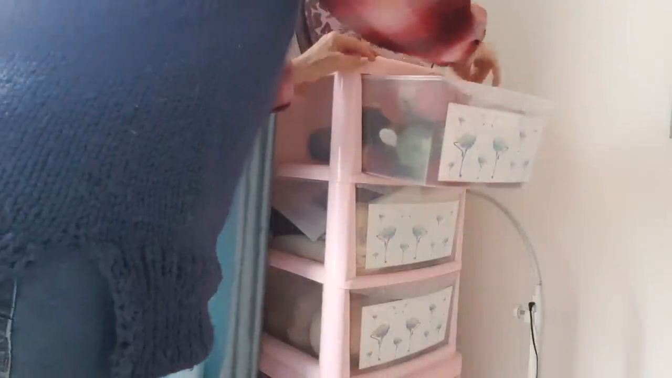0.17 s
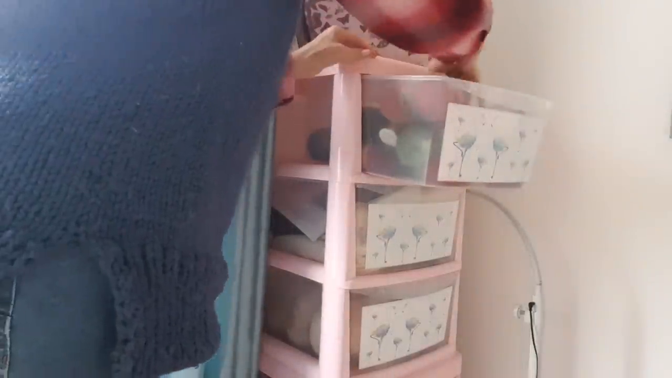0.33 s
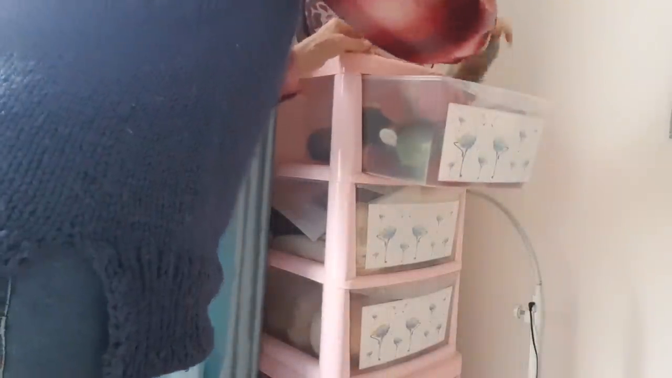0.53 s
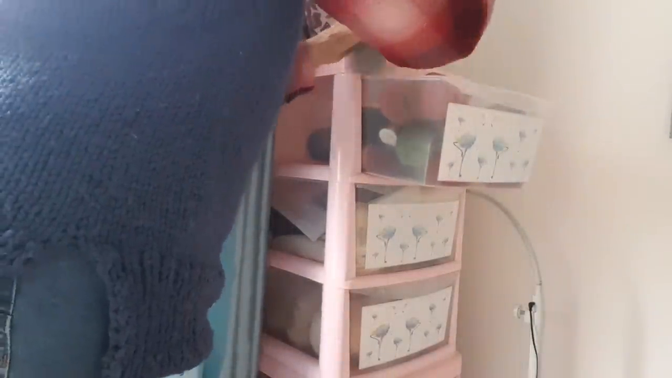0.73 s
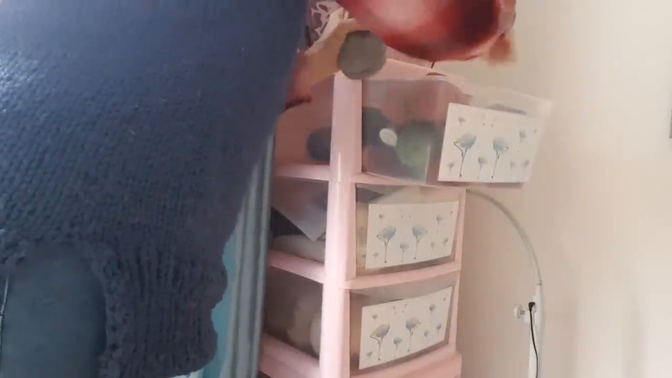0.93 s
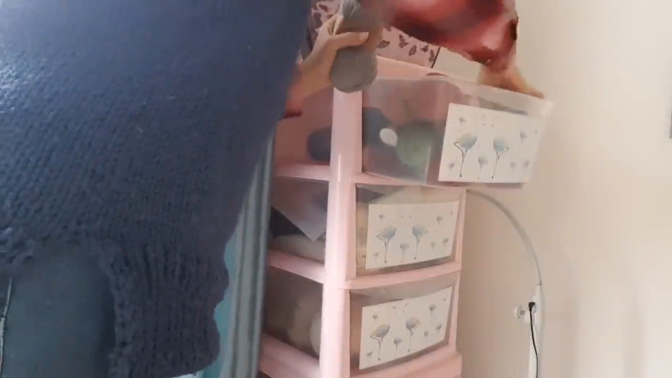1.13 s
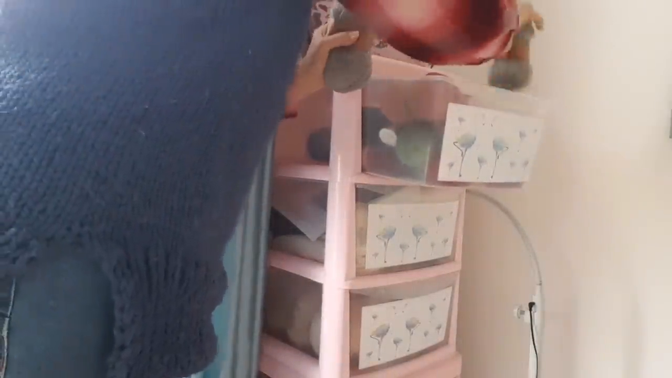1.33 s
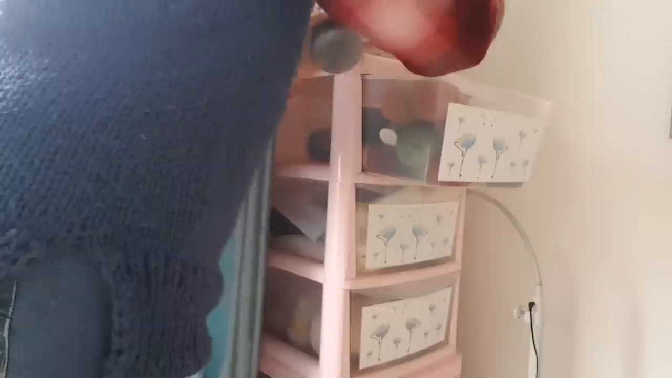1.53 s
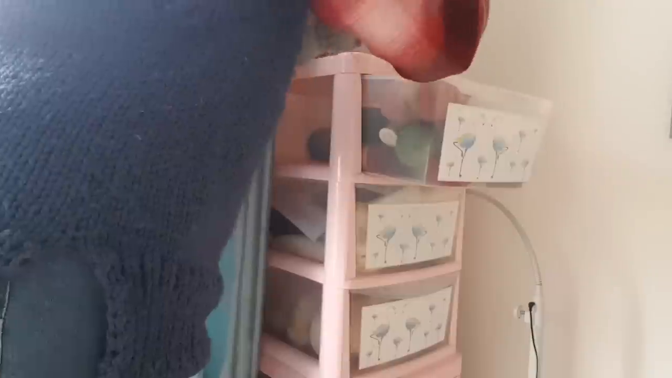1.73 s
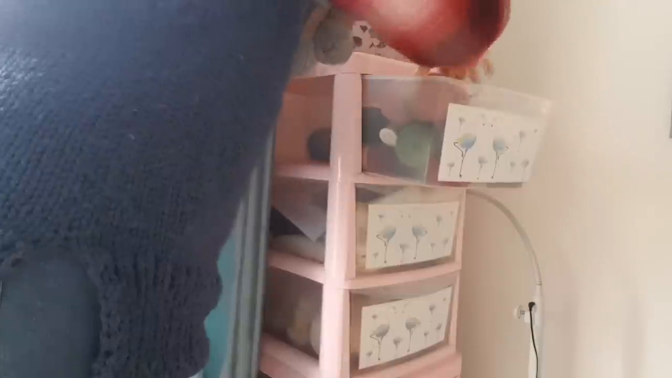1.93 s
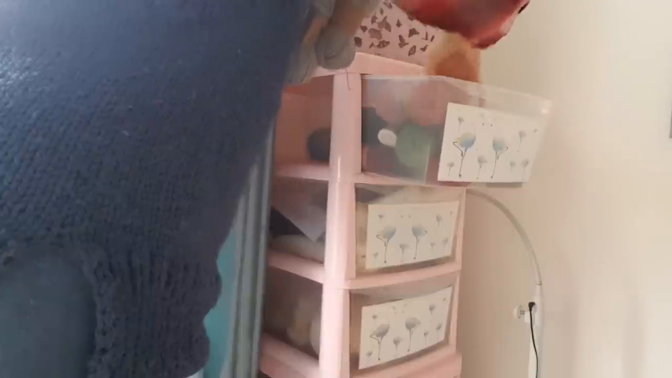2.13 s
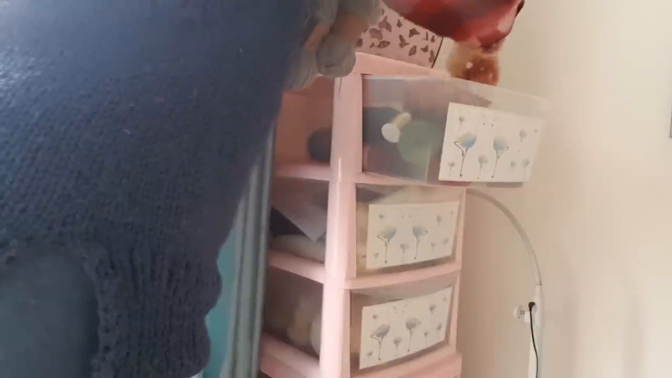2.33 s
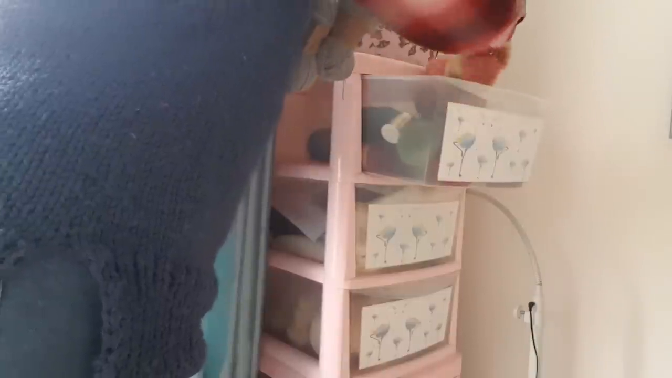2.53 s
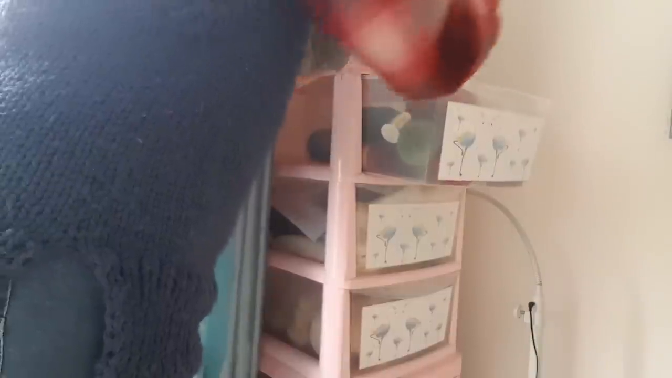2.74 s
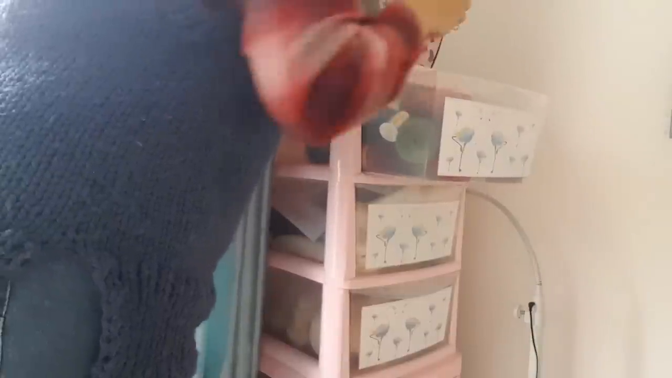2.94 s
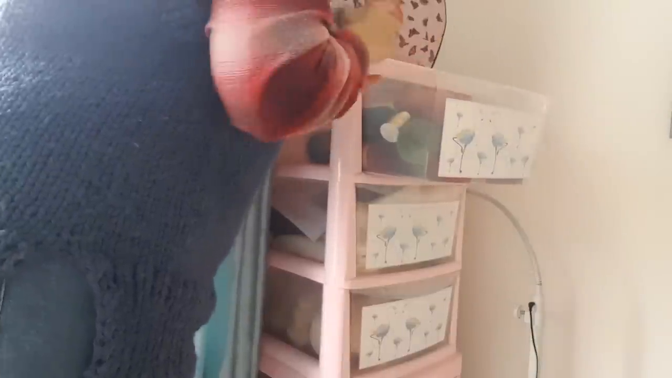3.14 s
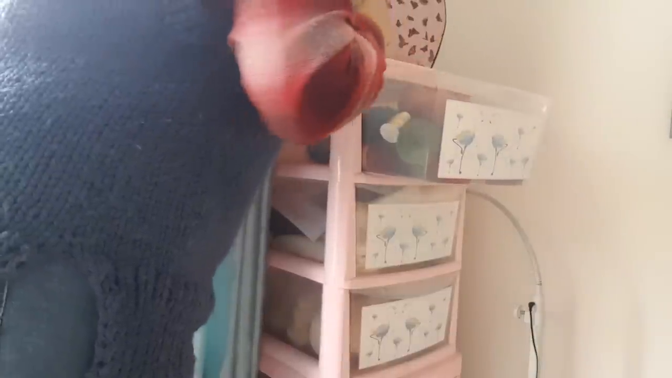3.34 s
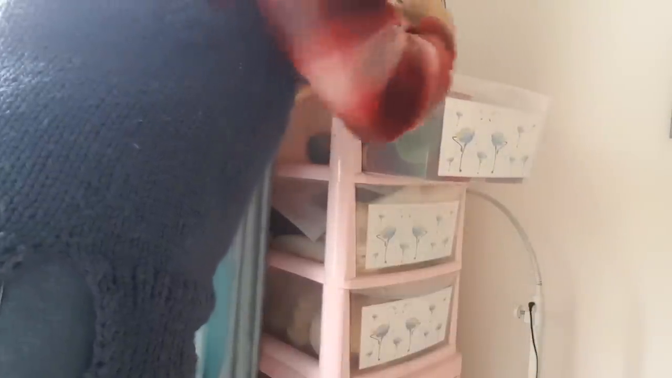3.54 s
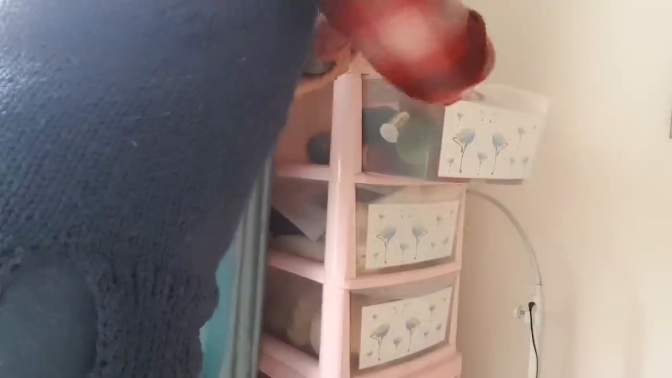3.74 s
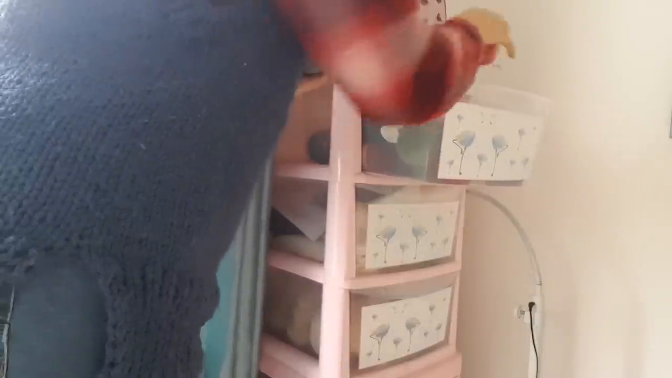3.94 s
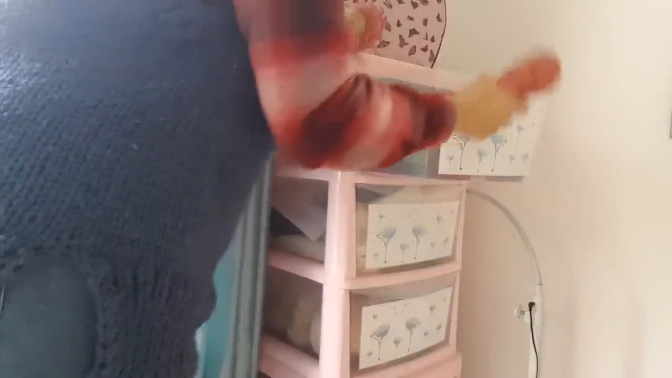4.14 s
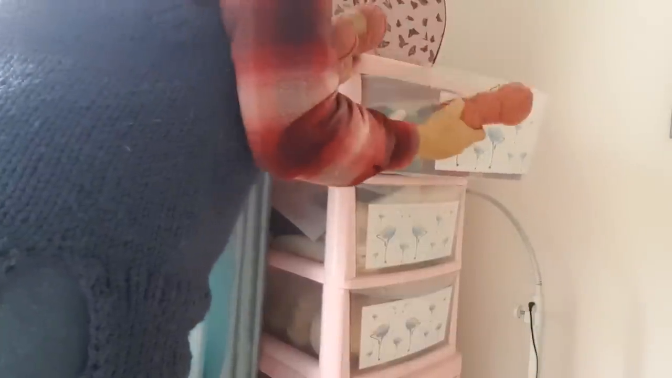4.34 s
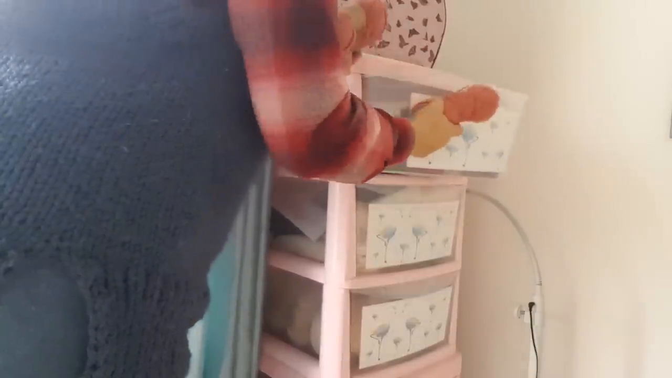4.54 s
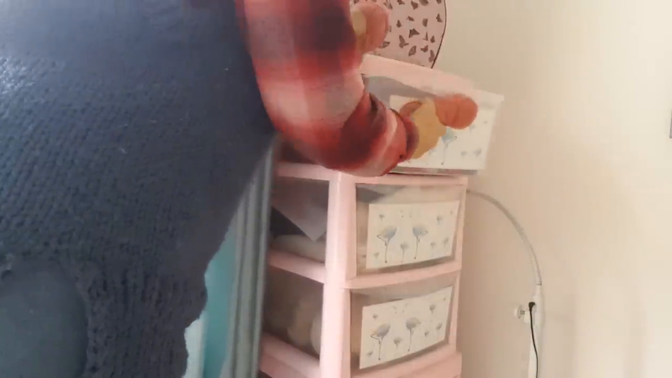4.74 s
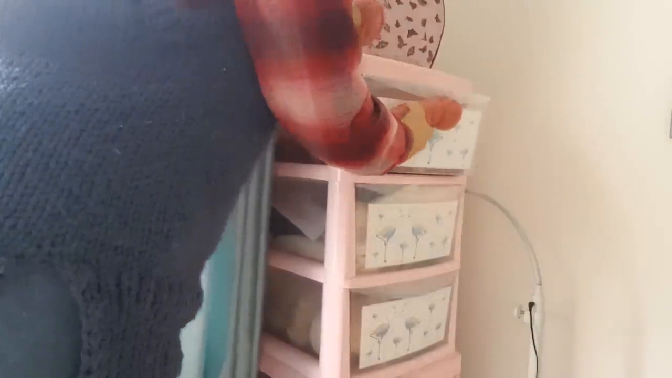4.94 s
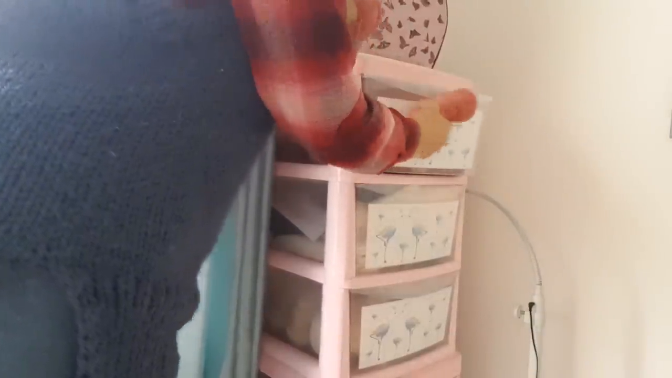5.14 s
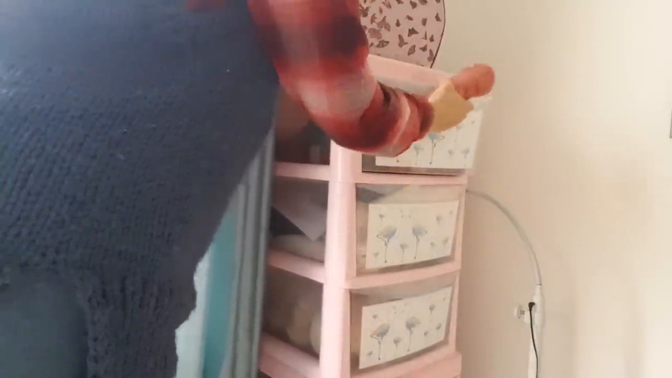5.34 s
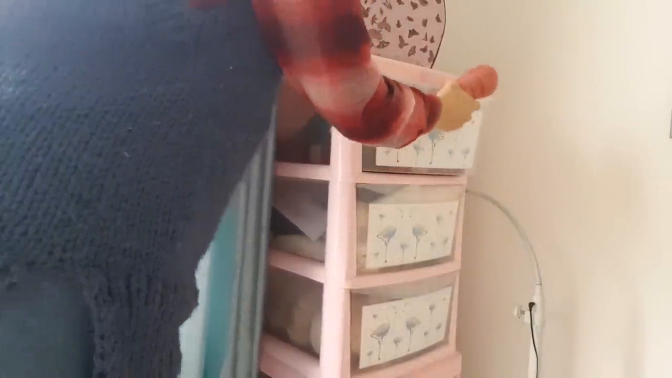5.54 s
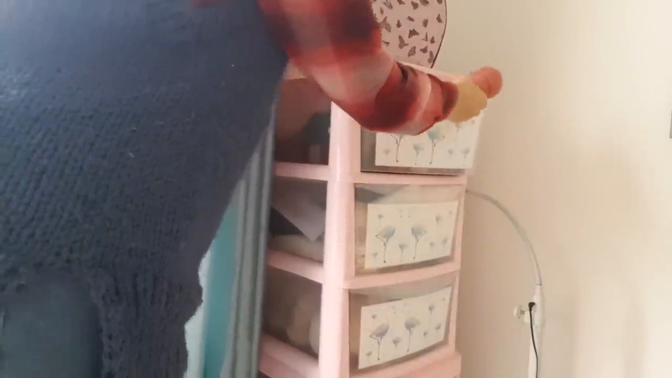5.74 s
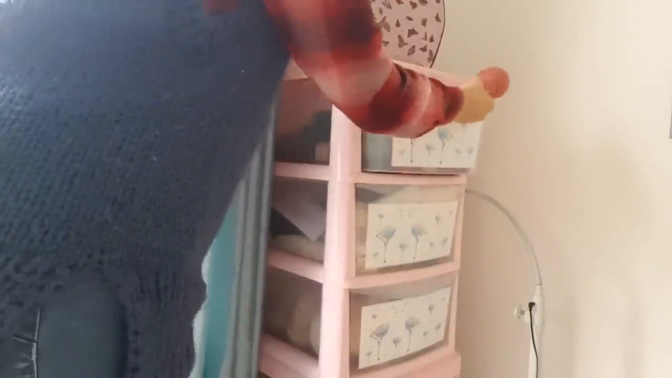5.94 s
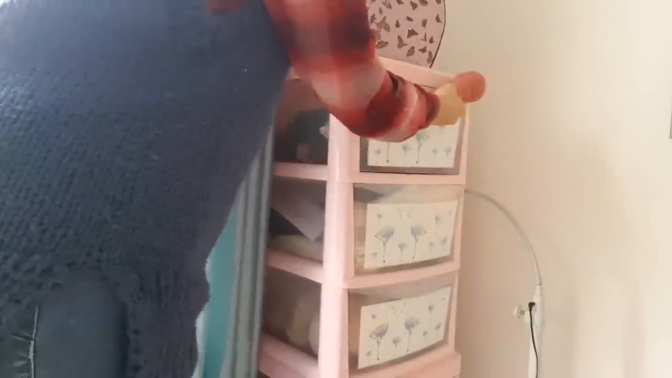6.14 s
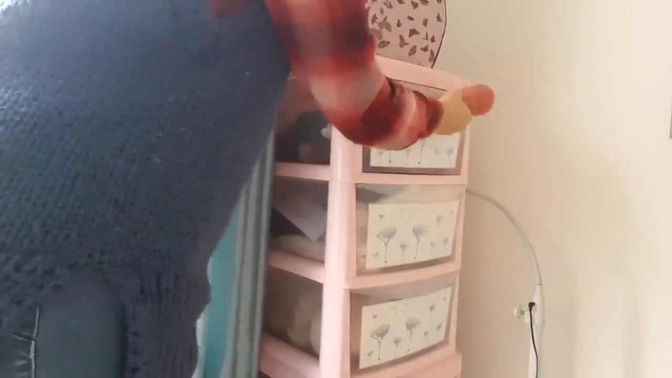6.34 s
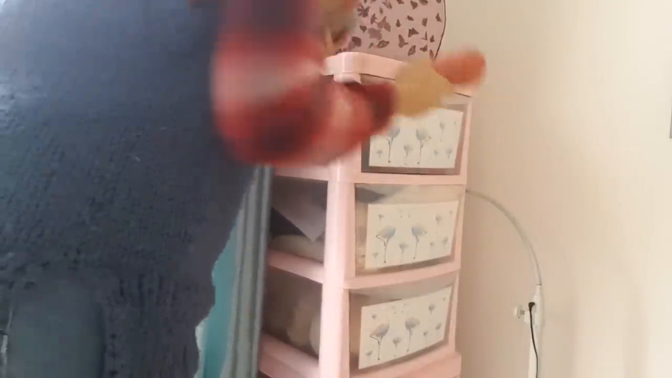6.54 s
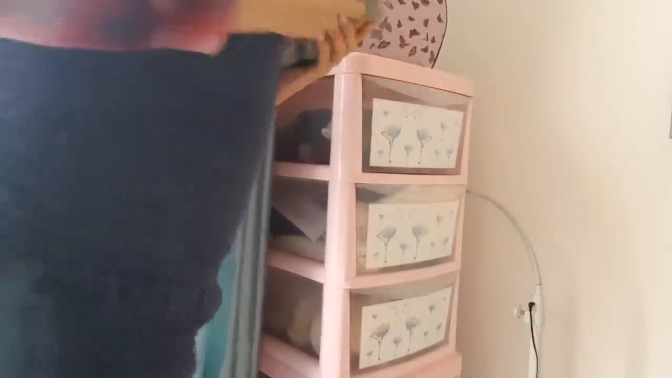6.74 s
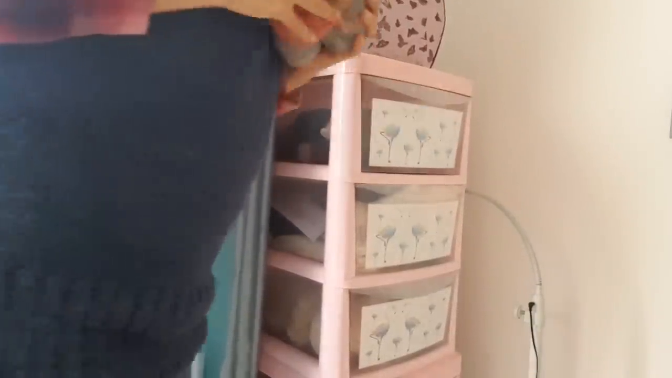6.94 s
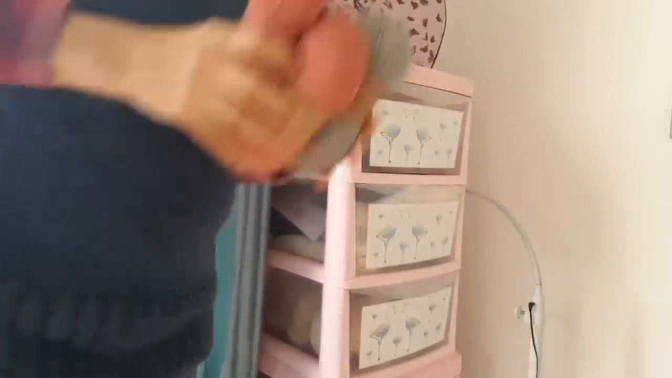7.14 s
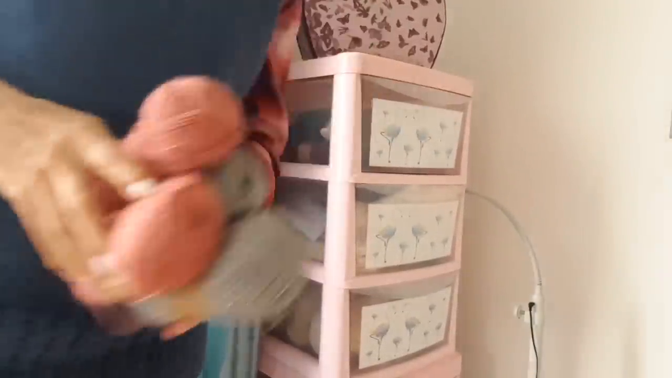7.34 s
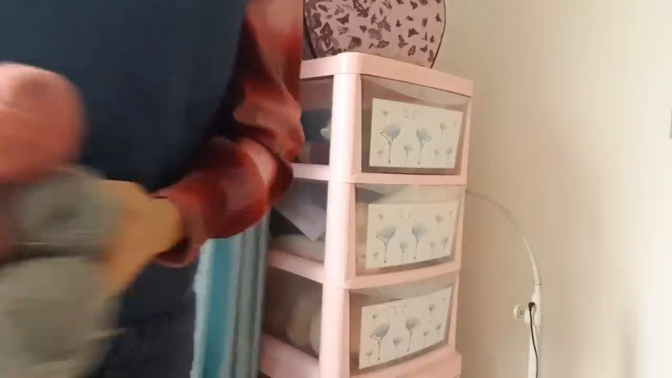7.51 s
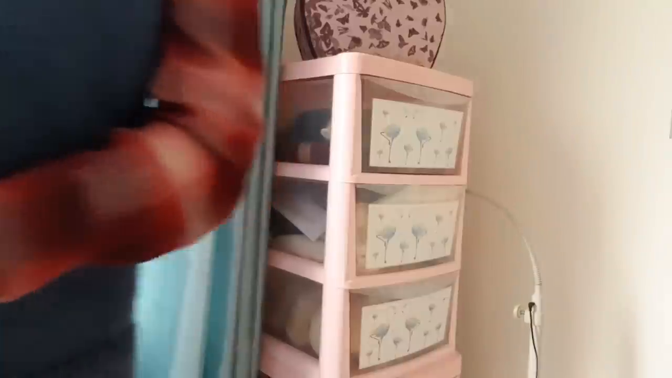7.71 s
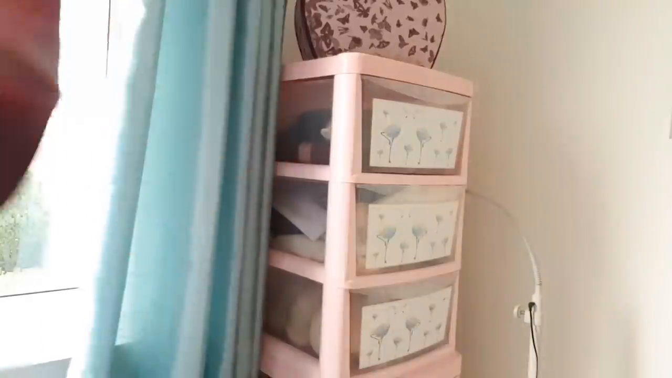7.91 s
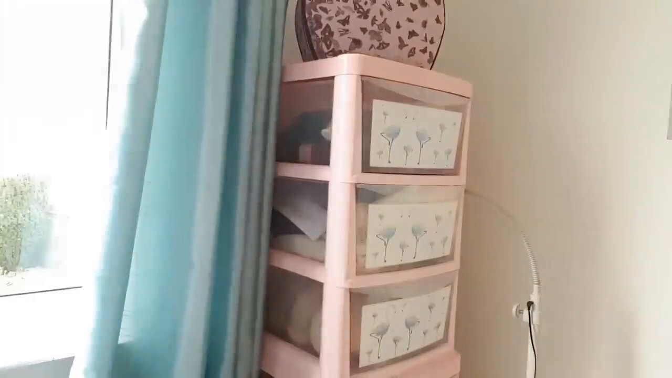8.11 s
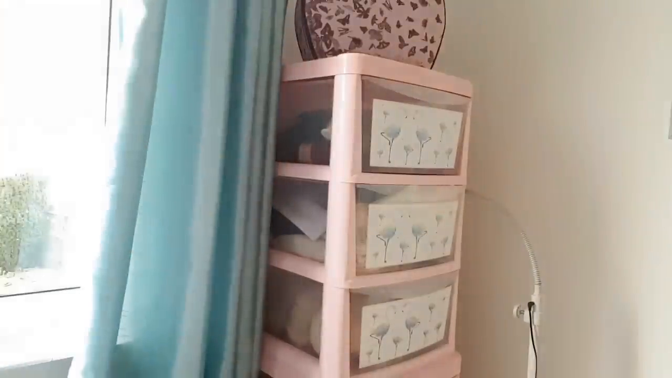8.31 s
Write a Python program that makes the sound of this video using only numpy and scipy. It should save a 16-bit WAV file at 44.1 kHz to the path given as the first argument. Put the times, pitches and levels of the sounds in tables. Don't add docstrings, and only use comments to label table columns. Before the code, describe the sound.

A phone about a metre away picks up a flimsy plastic drawer tower indoors. Quiet fumbling first: brushes, snaps, a yarn ball's dull thump, small hollow bumps. Then stick-slip scraping and knocking as the drawer is forced in, hitting hard twice, the second burst loudest, with a low tubby ring. Fabric swishes and a couple of clacks follow, then soft low steps, leaving a near-quiet room with short reverberation.

```python
import sys
import numpy as np
from scipy import signal
from scipy.fft import rfft, irfft, next_fast_len
from scipy.io import wavfile
from scipy.ndimage import uniform_filter1d

SR = 44100
rng = np.random.default_rng(int(sys.argv[2]) if len(sys.argv) > 2 else 0)


def to_linear_factor(level_db):
    exponent = np.asarray(level_db, float) / 20
    return 10 ** exponent


def inscribe(sig):
    pcm = np.round(np.clip(np.atleast_2d(sig).T, -1, 1) * 32767)
    wavfile.write(sys.argv[1], SR, pcm.astype(np.int16))


N = 369100
SIZE = 20480
HZ = np.fft.rfftfreq(SIZE, 1 / SR)

# [f/Hz, width/Hz, level/dB]
BELLY_MODES = [(130, 57, -11), (149.4, 13.3, 0), (196.3, 15, 1.5), (242, 29, -8)]
# [f/Hz, width/Hz, level/dB]
FRAME_MODES = [(54.3, 20, 1), (83.6, 20, 2.5)]
# [f/Hz, width/Hz, level/dB]
WALL_MODES = [(315.8, 63, -1), (357, 15.3, 1), (400, 20, -4.5), (472, 63, -4.5), (507, 41, -4),
              (800, 244, -15.5)]
# [f/Hz, level/dB]
AIR_COLOUR = [(3000, -37.5), (7000, 0.5), (9000, -2.5), (12000, 1), (16000, -11.5)]


def unit(x):
    return x / np.sqrt(np.mean(x ** 2) + 1e-20)


def peak_one(response):
    return response / np.abs(irfft(response)).max()


def along(points, hz):
    f, v = np.transpose(points)
    return np.interp(np.log(hz + 1), np.log(f + 1), v)


def filtered(x, response):
    size = next_fast_len(N + SR // 2)
    spectrum = rfft(x, size) * response(np.fft.rfftfreq(size, 1 / SR))
    return irfft(spectrum, size)[:, :N]


def even(spectrum, size):
    return spectrum / np.sqrt(np.abs(uniform_filter1d(np.abs(spectrum) ** 2, size)) + 1e-20)


def modes(table, hz):
    total = 0
    for k, (centre, width, db) in enumerate(table):
        resonance = 1j * hz * width / (centre * centre - hz * hz + 1j * hz * width)
        total = total + (-1) ** k * to_linear_factor(db) * resonance
    return total


def steep(table, hz, low_hz, high_hz):
    return modes(table, hz) / (1 + 1j * hz / high_hz) ** 2 / (1 + low_hz / (1j * hz + 0.0011)) ** 2


def causal(points, hz):
    cepstrum = irfft(np.log(to_linear_factor(along(points, hz))))
    cepstrum[1:len(hz) - 1] *= 2
    cepstrum[len(hz):] = 0
    return np.exp(rfft(cepstrum))


def ports(hz):
    # [f/Hz, correlation]
    likeness = [(100, .985), (300, .93), (600, .72), (1200, .25), (8000, .1)]
    turn = np.arccos(np.clip(along(likeness, hz), -1, 1)) / 2
    return np.array([np.cos(turn), np.sin(turn)])


def stereo(pair, gain):
    mid, side = filtered(pair, lambda hz: gain(hz) * ports(hz))
    return unit(np.array([mid + side, mid - side]))


def tails(count, onset):
    # [f/Hz, t60/s]
    decay = [(60, 0.39), (200, 0.25), (1000, 0.34), (4000, 0.28), (12000, 0.23)]
    # [f/Hz, level/dB]
    wet_colour = [(60, -2.5), (250, -3), (700, 3), (3000, 4.5), (12000, 0)]
    f, t = np.fft.rfftfreq(256, 1 / SR), np.arange(130) * 128 / SR
    z = rng.standard_normal((count, 2, len(f), len(t), 2)) @ [1, 1j]
    fading = z * to_linear_factor(-60 * t / along(decay, f)[:, None])
    tail = signal.istft(fading, SR, nperseg=256)[1]
    tail *= 1 - np.exp(-np.arange(tail.shape[-1]) / SR / onset)
    pairs = even(rfft(tail, SIZE), size=40) * ports(HZ) * to_linear_factor(along(wet_colour, HZ))
    mid, side = pairs[:, 0], pairs[:, 1]
    return np.stack([mid + side, mid - side], axis=1)


def room(tail, early):
    echoes = np.zeros(tail.shape[:2] + (SIZE,))
    delay = rng.uniform(.003, .028, tail.shape[:2] + (7,))
    level = early * to_linear_factor(-260 * delay) * rng.choice([-1, 1], delay.shape)
    np.put_along_axis(echoes, (delay * SR).astype(int), level, axis=2)
    return 1 + rfft(echoes) * HZ ** 2 / (HZ ** 2 + 600 ** 2) + tail


def contacts(table, body, click, chatter, rise, t60, wet_db):
    t = np.arange(SIZE // 6) / SR
    fade = np.clip(4 - 5 * np.arange(SIZE) / SIZE, 0, 1)
    out = np.zeros((2, N + SIZE))
    pool = room(to_linear_factor(wet_db) * tails(count=6, onset=0.0019), early=0.53)
    for k, (s, *row) in enumerate(table):
        burst = rng.standard_normal(len(t)) * to_linear_factor(-60 * t / t60) * (1 - np.exp(-t / rise))
        force = click + chatter * even(rfft(burst, SIZE), size=40)
        heard = irfft(force * body(*row) * pool[k % len(pool)])
        out[:, round(s * SR):][:, :SIZE] += fade * heard
    return out[:, :N]


def rim(hz, share):
    return peak_one(steep([(hz, share * hz, 0)], HZ, hz / (1 + 4 * share), hz * (1 + 3.7 * share)))


def plastic_top(clack_db, tick_db):
    # [f/Hz, level/dB]
    clack = [(400, -52), (750, 0), (1100, 7), (1700, 7.5), (2600, -2.5), (4500, -20), (9000, -69)]
    # [f/Hz, level/dB]
    tick = [(1500, -32), (3000, 4), (5000, 11), (7500, 4), (8500, -1.5), (12000, 3), (16000, -10)]
    return to_linear_factor(clack_db) * peak_one(causal(clack, HZ)) + to_linear_factor(tick_db) * peak_one(causal(tick, HZ))


def sharp_edge(air_db):
    # [f/Hz, level/dB]
    edge = [(1200, -45), (2500, 5), (3500, 5.5), (6500, -1), (8000, -18), (14000, -29.5)]
    return peak_one(causal(edge, HZ)) + to_linear_factor(air_db) * peak_one(causal(AIR_COLOUR, HZ))


def hollow_tub(weight_db, walls_db):
    # [f/Hz, width/Hz, level/dB]
    low_room_ring = [(132, 4.7, -2), (165, 8.4, -4), (201.7, 7.9, -4.5), (232.3, 8.4, 0)]
    # [f/Hz, width/Hz, level/dB]
    upper_room_ring = [(312, 5.3, -2), (355, 9.2, 1), (393, 6.4, -3), (491.5, 11, -9)]
    belly = peak_one(steep(BELLY_MODES, HZ, 90, 320)) + to_linear_factor(-9) * peak_one(modes(low_room_ring, HZ))
    frame = peak_one(steep(FRAME_MODES, HZ, 55, 110))
    walls = peak_one(steep(WALL_MODES, HZ, 250, 540)) + to_linear_factor(-11) * peak_one(modes(upper_room_ring, HZ))
    return belly + to_linear_factor(weight_db) * frame + to_linear_factor(walls_db) * walls


def light_body(air_db):
    edge = sharp_edge(air_db)
    return lambda db, hz, share, edge_db: to_linear_factor(db - 6.5) * (rim(hz, share) + to_linear_factor(edge_db + 9.5) * edge)


def dull_body(db, hz, share, hard_db):
    return to_linear_factor(db - 3.5) * (rim(hz, share) + plastic_top(hard_db + 1.57, 0.94 * hard_db - 2.3))


def edge_body(db, air_db):
    return to_linear_factor(db) * sharp_edge(air_db)


def single_mode(hz, width_hz):
    return modes([(hz, width_hz, 0)], HZ)


def quiet_room():
    # [f/Hz, level/dB per Hz]
    floor_colour = [(20, -21.5), (50, 0), (90, -6.5), (160, -12.5), (400, -22.5), (1200, -20.5),
                    (4000, -28.5), (8000, -47.5), (10000, -32), (12000, -23.5), (15800, -20)]
    floor_db = -64.5 - 0.5
    noise = rng.standard_normal((2, N))
    return to_linear_factor(floor_db) * stereo(noise, lambda hz: to_linear_factor(along(floor_colour, hz)))


def strokes(table, rise_db_per_s, fall_db_per_s):
    start, length, db, *trims_db = np.transpose(table)[:, :, None]
    t = np.arange(0, N, 64) / SR
    swell_db = rise_db_per_s * np.maximum(start - t, 0)
    fade_db = fall_db_per_s * np.maximum(t - start - length, 0)
    shape_db = db - swell_db - fade_db
    gains = [np.linalg.norm(to_linear_factor(shape_db + trim), axis=0) for trim in (0, *trims_db)]
    return [np.interp(np.arange(N) / SR, t, gain) for gain in gains]


def slips(rate, spread_db, life):
    size_db = spread_db * np.minimum(rng.exponential(size=N), 3.5)
    starts = (rng.random(N) < rate / SR) * to_linear_factor(size_db)
    gate = signal.lfilter([1], [1, -np.exp(-1 / (life * SR))], starts)
    return unit(gate) * rng.standard_normal((2, N))


def rubbing():
    # [start t/s, length/s, hiss level/dB, coarse drag re hiss/dB, fibre re hiss/dB]
    rustle_strokes = [(0.03, 0.061, -52, -13, -5), (0.125, 0.018, -53, -2, -12), (0.47, 0.16, -72, 3, 5.5),
                      (0.785, 0.096, -75.5, 6, 15), (1.06, 0.02, -80, 8, -10), (1.12, 0.041, -65, 1, 4),
                      (1.73, 0.049, -62, 5, 2), (2.26, 0.15, -61, -5.5, -1), (2.63, 0.25, -69.5, 0, -1),
                      (3.24, 0.054, -58, -16, -7), (3.36, 0.16, -71, 5.5, 3), (4.46, 0.21, -65, -2, 8),
                      (4.76, 0.16, -51, -1, 0), (6.0, 0.16, -60.5, -22, 11), (6.46, 0.093, -57, 5, -5),
                      (6.66, 0.072, -65, 5, 3), (6.84, 0.03, -58, -8, 1), (6.9, 0.055, -48, -5, -4),
                      (6.99, 0.1, -45.5, -5, -5), (7.14, 0.03, -62, 15, -1.5), (7.25, 0.17, -60, 3.5, -0.5),
                      (7.52, 0.158, -72.5, 0.5, 4.5), (7.75, 0.15, -66, -1, 3), (8.0, 0.159, -64.5, 0, 6),
                      (8.28, 0.1, -59, 1, -2)]
    # [start t/s, length/s, scrape level/dB, tub load re scrape/dB, speed hiss re scrape/dB]
    slide_strokes = [
        (2.11, 0.056, -59, 0, -11.5),
        (2.43, 0.031, -65, 15, 0),
        (4.39, 0.23, -49, -1, -18),
        (4.52, 0.2, -49, 0, -9.5),
        (4.78, 0.16, -46, 8.5, -5),
        (5.06, 0.18, -50, 4.5, -9.5),
        (5.42, 0.31, -62.5, 10.5, -14),
        (5.76, 0.15, -50, 12.5, -30),
        (5.96, 0.21, -44.5, 2, -8),
        (6.2, 0.1, -54.5, 24, -19),
    ]
    # [f/Hz, width/Hz, level/dB]
    runner_modes = [(470, 112, -5), (650, 118, 1), (870, 533, 1.5), (1050, 364, 3.5), (1620, 780, -6.5),
                    (2390, 350, -2), (2900, 680, -8.5)]
    # [f/Hz, level/dB]
    hiss_colour = [(1800, -32), (3200, -5.5), (3800, 0), (5500, 0.5), (7300, -8), (8300, -20.5),
                   (12000, -21)]
    # [tub, drag, hiss, air level/dB]
    stir_db = [-74, -81, -84, -81]
    runner, load, speed = strokes(slide_strokes, rise_db_per_s=253.5, fall_db_per_s=228.5)
    cloth, coarse, fine = strokes(rustle_strokes, rise_db_per_s=247, fall_db_per_s=192)

    def tub(hz):
        walls, frame = steep(WALL_MODES, hz, 337, 566), steep(FRAME_MODES, hz, 40, 127.8)
        return steep(BELLY_MODES, hz, 90, 320) + 0.96 * walls + 0.31 * frame

    rumble = stereo(slips(rate=170, spread_db=-4.0, life=0.017), tub)
    scrape = stereo(slips(rate=320, spread_db=2.5, life=0.03), lambda hz: steep(runner_modes, hz, 360, 6800))
    wool = slips(rate=1500, spread_db=-2.0, life=0.012)
    hiss = stereo(wool, lambda hz: to_linear_factor(along(hiss_colour, hz)))
    air = stereo(wool, lambda hz: to_linear_factor(along(AIR_COLOUR, hz)))
    tub_stir, drag_stir, hiss_stir, air_stir = to_linear_factor(stir_db)
    out = (load + to_linear_factor(-24) * coarse + tub_stir) * to_linear_factor(-3.0) * rumble
    out += (runner + coarse + drag_stir) * to_linear_factor(1.27) * scrape
    out += (speed + cloth + hiss_stir) * to_linear_factor(1.0) * hiss
    out += (to_linear_factor(-19) * speed + fine + air_stir) * air
    return out


def thuds():
    # [t/s, level/dB, f/Hz, width share, hardness/dB]
    thud_events = [
        (0.751, -33, 307, 0.32, -22),
        (1.102, -22.5, 330, 0.16, -20),
        (1.334, -43, 215, 0.28, -30),
        (7.293, -31, 440, 0.79, -17),
        (7.305, -35, 172.4, 0.58, -4),
        (7.699, -37, 223, 0.7, 0.5),
        (7.729, -30.5, 166, 1, -17),
        (7.79, -27.5, 102, 0.8, -9.5),
        (7.82, -37.5, 101.5, 1, -13),
        (7.983, -37, 132, 0.85, -14.5),
    ]
    return contacts(thud_events, dull_body, click=0.7, chatter=1.15, rise=0.00099, t60=0.14, wet_db=5.5)


def brushes():
    # [t/s, level/dB, fine edge re brush/dB]
    brush_events = [
        (0.009, -70.5, 18),
        (0.125, -49.5, 15.5),
        (0.789, -31, -9),
        (1.646, -47, -1.5),
        (1.71, -37.5, 0),
        (2.25, -55, 5.5),
        (3.09, -44.5, -5.5),
        (5.65, -47, 0),
        (6.649, -40.5, -13.5),
        (8.27, -41.5, -6),
    ]
    body = lambda db, fine_db: to_linear_factor(db + 2.0) * plastic_top(0, fine_db + 15.0)
    return contacts(brush_events, body, click=0, chatter=0.98, rise=0.0095, t60=0.19, wet_db=2.0)


def scuffs():
    # [t/s, level/dB, f/Hz, width share, edge re drag/dB]
    scuff_events = [
        (2.25, -30, 2580, 0.23, -19.5),
        (4.098, -37.5, 520, 0.41, 0.5),
        (6.603, -34, 1800, 0.21, -14.5),
        (4.745, -20.5, 490, 0.19, -27.5),
    ]
    return contacts(scuff_events, light_body(air_db=-11.5), click=0, chatter=1.2, rise=0.0083, t60=0.21, wet_db=1.5)


def snaps():
    # [t/s, level/dB, f/Hz, width share, edge re snap/dB]
    snap_events = [(0.057, -40, 1050, 0.3, -2.5), (0.146, -22.5, 1960, 0.47, -36),
                   (0.496, -50, 1050, 0.04, -25), (0.558, -54, 1200, 0.4, -40),
                   (0.763, -42.5, 525, 0.84, 7.5), (1.724, -24, 1260, 0.34, -31),
                   (2.603, -42.5, 1240, 0.42, -17), (2.808, -29.5, 1620, 0.63, -10.5),
                   (3.088, -41, 540, 0.41, -13.5), (3.176, -15, 1580, 0.75, -27),
                   (3.298, -35.5, 1050, 0.64, -17), (4.1, -46, 614, 0.42, -1),
                   (6.598, -32.5, 2440, 0.58, -14.5), (7.111, -27, 1200, 0.97, -45),
                   (7.397, -52, 1670, 0.66, -13.5), (7.482, -43.5, 1630, 0.94, -5.5)]
    return contacts(snap_events, light_body(air_db=2.0), click=1.37, chatter=0.22, rise=0.00013, t60=0.016,
                    wet_db=6.5)


def cracks():
    # [t/s, level/dB, air re crack/dB]
    crack_events = [
        (0.146, -54.5, -2.5),
        (0.556, -66.5, 22),
        (1.724, -42, 6),
        (4.518, -48, 5),
        (5.383, -51.5, -20),
        (5.899, -45.5, 3.5),
        (5.924, -32, 17),
        (7.397, -61, 17),
        (7.789, -47, -10.5),
    ]
    return contacts(crack_events, edge_body, click=2.91, chatter=0.92, rise=.001, t60=0.03, wet_db=-3.0)


def taps():
    # [t/s, level/dB, f/Hz]
    tap_events = [(0.056, -29, 5970), (0.628, -52, 7500), (4.372, -33.5, 1990), (5.79, -42, 2000),
                  (5.838, -32.5, 1100), (5.843, -32.5, 2400), (5.898, -15, 3500), (7.117, -27, 1210),
                  (7.124, -20.5, 1810), (7.203, -35, 2000), (5.654, -46, 5500), (5.87, -32, 4000),
                  (7.291, -32, 1000), (4.138, -42, 3500)]
    body = lambda db, hz: to_linear_factor(db) * peak_one(single_mode(hz, .9 * hz) ** 2)
    return contacts(tap_events, body, click=1, chatter=.15, rise=0.00029, t60=.006, wet_db=-8)


def shivers():
    # [t/s, level/dB, f/Hz, width share]
    shiver_events = [
        (0.17, -40, 2080, .12),
        (2.81, -47, 1680, .4),
        (4.1, -45, 1800, 0.24),
        (5.39, -41, 2580, .3),
    ]
    body = lambda db, hz, share: to_linear_factor(db) * peak_one(single_mode(hz, share * hz) ** 2)
    return contacts(shiver_events, body, click=0, chatter=1.3, rise=.006, t60=.3, wet_db=0.0)


def pings():
    # [t/s, level/dB, f/Hz, width share]
    ping_events = [(0.5, -61.5, 314, 0.11), (1.336, -45.5, 393, 0.18), (1.722, -38.5, 416, 0.51),
                   (4.098, -45.5, 560, .5), (4.136, -27.5, 570, 0.43), (4.157, -39.5, 600, 0.72),
                   (4.198, -52, 560, 0.45), (4.277, -39, 596, 0.51), (4.296, -33, 650, 0.61),
                   (4.516, -27, 910, 0.48), (4.875, -20, 713, 0.4), (4.877, -16, 490, 0.2),
                   (4.898, -20, 483, 0.26), (4.89, -21.5, 1090, 0.16), (5.742, -27, 1250, 0.85),
                   (5.838, -30, 1050, 0.63), (5.92, -16, 516, 0.33), (6.226, -21, 279.3, 0.2),
                   (7.7, -34, 710, 0.44), (7.985, -41, 800, 0.55), (0.165, -40, 2060, .25),
                   (6.188, -11, 445, .3), (6.24, -25, 454, 0.085), (5.898, -25.5, 198.3, 0.48),
                   (1.11, -26.5, 248, 0.48)]
    body = lambda db, hz, share: to_linear_factor(db) * peak_one(rim(hz, share) ** 2)
    return contacts(ping_events, body, click=0.297, chatter=1.24, rise=0.0041, t60=.03, wet_db=-4)


def pushes():
    # [t/s, level/dB, frame weight/dB, wall share/dB, hardness/dB]
    push_events = [(0.125, -49.5, -22, 6, 18.5), (0.755, -34, -7, 3.5, 3.5), (1.982, -34, 14, 5, -7),
                   (2.122, -26, -1, -12, -14.5), (2.461, -31.5, -13.5, -9, -16),
                   (4.098, -39.5, -5, -1, -24), (4.301, -34.5, -33, -0.5, -4), (4.415, -25.5, -3, -1.5, -8),
                   (4.438, -27.5, -13, 0.5, -3.5), (4.548, -33.5, -13.5, -6, -11),
                   (4.748, -49, -21.5, 21.5, -8), (5.041, -36, 4, 7, -8), (5.198, -40, 3.5, -15, -12),
                   (5.413, -30, -27, -12, -9), (6.076, -27, 4, -22, -15)]

    def body(db, weight_db, walls_db, hard_db):
        top = plastic_top(hard_db + 3.0, 1.63 * hard_db + 5.5)
        return to_linear_factor(db - 4.0) * (hollow_tub(weight_db - 3.0, walls_db - 0.6) + top)

    return contacts(push_events, body, click=0, chatter=1.25, rise=0.012, t60=0.12, wet_db=-2.0)


def grinds():
    # [t/s, level/dB, air re grind/dB]
    grind_events = [(4.372, -54, -17.5), (4.877, -31.5, 4), (5.868, -40, -9), (5.897, -24, -10.5),
                    (5.914, -41, -0.5), (5.919, -31.5, 3), (5.945, -43, 13), (6.19, -27, -3.5),
                    (0.012, -57, 16), (0.056, -58, 9), (4.099, -47, -14), (4.137, -45.5, -16),
                    (5.384, -48, -21)]
    return contacts(grind_events, edge_body, click=0, chatter=3.36, rise=.003, t60=0.017, wet_db=-4.5)


def catches():
    # [t/s, level/dB, f/Hz, width share, edge re catch/dB]
    catch_events = [(1.695, -27.5, 684, 0.73, -21), (1.724, -21, 1310, 0.66, -32),
                    (1.731, -29, 1490, 0.93, -28), (7.111, -15, 1130, 0.49, -41),
                    (7.124, -24, 1280, 0.62, -28), (7.293, -29, 694, 0.51, -35),
                    (2.104, -29, 692, 0.25, -14.5), (4.371, -22, 610, 0.75, -26.5),
                    (4.518, -36, 830, 0.26, -24), (4.537, -29, 1050, 0.11, -14),
                    (4.875, -16, 690, 0.26, -7.5), (5.044, -33.5, 627, 0.66, -5.5),
                    (5.077, -25.5, 1650, 0.43, -29), (5.871, -23, 947, .7, -16.5),
                    (5.896, -17.5, 810, 0.29, -16.5), (5.924, -11.5, 775, 0.98, -11.5),
                    (6.188, -9, 810, 0.44, -35), (6.344, -21.5, 945, 1, -36), (6.377, -24, 2130, 0.35, -33),
                    (1.674, -39, 705, .6, -21), (1.729, -23, 2510, 0.078, -26),
                    (2.009, -37, 900, 0.66, -22), (2.412, -35, 850, 0.14, -26.5),
                    (2.458, -37.5, 900, 0.39, -22), (4.373, -27.5, 2000, 0.15, -34),
                    (4.418, -24, 680, 0.34, -25), (4.593, -38, 595, 0.49, -22.5),
                    (5.877, -22.5, 958, .3, -22.5), (6.192, -11.5, 900, 1, -22),
                    (6.648, -39, 1000, 0.42, -22), (7.137, -32, 1200, 0.64, -24.5)]
    return contacts(catch_events, light_body(air_db=-19.5), click=1.7, chatter=0.97, rise=0.0012, t60=0.011,
                    wet_db=-4.0)


def booms():
    # [t/s, level/dB, f/Hz, width share, hardness/dB]
    boom_events = [(2.009, -26, 324, 0.12, -27), (2.131, -24, 324, 0.12, -26.5),
                   (2.408, -34.5, 350, 0.071, -24), (2.457, -32, 353, 0.082, -15),
                   (4.383, -29, 347, 0.093, -21), (4.419, -19.5, 146, .25, -24),
                   (4.442, -18.5, 171, 0.23, -31), (4.877, -15.5, 353, 0.098, -33),
                   (4.886, -18, 223, 0.081, -33), (4.92, -13.5, 165, 0.18, -26),
                   (4.936, -20, 355, 0.077, -31), (5.924, -17, 165, 0.199, -22),
                   (5.953, -15.5, 232, 0.18, -28), (6.197, -7.5, 222, 0.16, -31),
                   (6.225, -11.5, 232, 0.13, -27)]
    return contacts(boom_events, dull_body, click=1.55, chatter=0.26, rise=0.0017, t60=0.025, wet_db=-1)


def tones():
    # [t/s, level/dB, f/Hz, t60/s]
    tone_events = [(1.108, -24.5, 318, 0.18), (1.124, -25, 199, .18), (1.11, -37.5, 60.2, 0.38),
                   (4.369, -32, 930, 0.057), (4.518, -28.5, 840, .04), (4.876, -18, 258, 0.077),
                   (4.877, -12.5, 355, 0.32), (4.877, -19, 734, 0.056), (4.93, -22.5, 183.2, 0.26),
                   (5.416, -24.5, 196, .1), (5.898, -10, 198, 0.082), (5.9, -20.5, 81, 0.37),
                   (5.924, -10, 170, .08), (5.95, -7.5, 210, .1), (5.978, -16.5, 165, 0.15),
                   (6.196, -11.5, 218, 0.15), (6.25, -26.5, 472, .36), (6.275, -24.5, 235.4, 0.37),
                   (6.25, -29, 137, 0.28), (6.34, -30.5, 208.5, .3), (5.935, -21, 345, .25),
                   (6.285, -28, 300, .3), (6.31, -41, 550, .25), (6.075, -28, 190, .25),
                   (4.9, -20, 397, .15), (2.39, -38, 1400, .03)]

    def body(db, hz, t60):
        width_hz = np.log(1000) / np.pi / t60
        return to_linear_factor(db) * peak_one(single_mode(hz, width_hz) / (1 + 1j * HZ / hz) ** 2)

    return contacts(tone_events, body, click=0.95, chatter=.05, rise=.001, t60=0.0089, wet_db=-9)


def knocks():
    # [t/s, level/dB, frame weight/dB, wall share/dB, hardness/dB], last three re blow
    knock_events = [(1.108, -29, -25, 1, 3), (1.124, -39.5, -19, -2, 9), (2.004, -23, -2.5, -2.5, -12),
                    (2.103, -21, -24, -7, -13.5), (2.39, -28.5, -29, 1, -2.5), (4.273, -35, -40, 4.5, 1.5),
                    (4.37, -29, -1, 2.5, -22), (4.517, -28.5, -12.5, 0.5, -5), (4.875, -9.5, -14, -6.5, -5),
                    (4.919, -14, -16, -10.5, -7.5), (5.383, -30, -13, -5, -6.5), (5.711, -29, -19, -3.5, 0),
                    (5.74, -33.5, -21, -30, -2), (5.839, -28.5, -19, -9.5, -8),
                    (5.872, -24.5, -30, -18, -4), (5.898, -15, -9.5, -7.5, 2), (5.923, -8, -19, -16.5, -10),
                    (5.949, -17, -27, -9.5, -14), (6.187, -6.5, -16, -8.5, -7), (6.224, -28, -3.5, -15, -3),
                    (6.345, -31.5, -15.5, -7, -9), (6.377, -29.5, -13.5, -17.5, 3)]

    def body(db, weight_db, walls_db, hard_db):
        top = plastic_top(hard_db + 0.52, 0.37 * hard_db - 7.5)
        return to_linear_factor(db - 8.5) * (hollow_tub(weight_db + 6.5, walls_db + 3) + top)

    return contacts(knock_events, body, click=1.51, chatter=1.0, rise=0.018, t60=0.033, wet_db=2.5)


def suppressed(x, knee_db, slope):
    level = np.sqrt(np.abs(uniform_filter1d(np.mean(x ** 2, 0), size=900)))
    return x * (level / (level + to_linear_factor(knee_db))) ** slope


def scene():
    # [f/Hz, level/dB]
    left_db = [(100, 2.5), (500, 2), (4000, 4), (12000, 3)]
    lead_s = 5 / SR
    away_s, away_lag = 7.5, 17
    hits = thuds() + brushes() + scuffs() + snaps() + cracks() + taps() + shivers() + pings()
    hits += pushes() + grinds() + catches() + booms() + tones() + knocks()
    near = suppressed(hits, knee_db=-62.0, slope=0.47) + rubbing()

    def lean(hz):
        half = to_linear_factor(along(left_db, hz) / 2) * np.exp(1j * np.pi * hz * lead_s)
        return half ** np.array([[1], [-1]])

    away = near * np.clip((np.arange(N) / SR - away_s) * 10, 0, 1)
    passing = np.array([np.pad(away[0], (away_lag, 0))[:N], away[1]])
    return filtered(near - away, lean) + passing + quiet_room()


def band_limit(x):
    return signal.sosfilt(signal.butter(12, 16690, fs=SR, output="sos"), x)


def record(dry):
    band = filtered(dry, lambda hz: hz < 15850)
    mix = band / (1 + np.abs(band / 1.1) ** 6) ** (1 / 6)
    return band_limit(mix)


dry = scene()
out = record(dry)
inscribe(out)
```